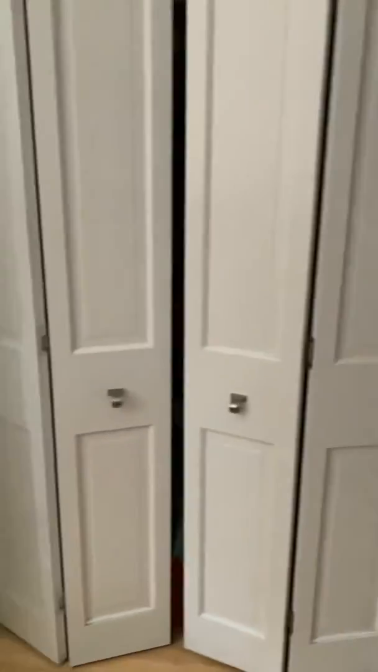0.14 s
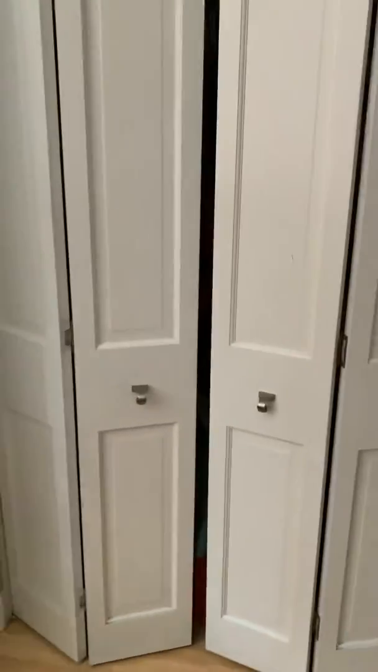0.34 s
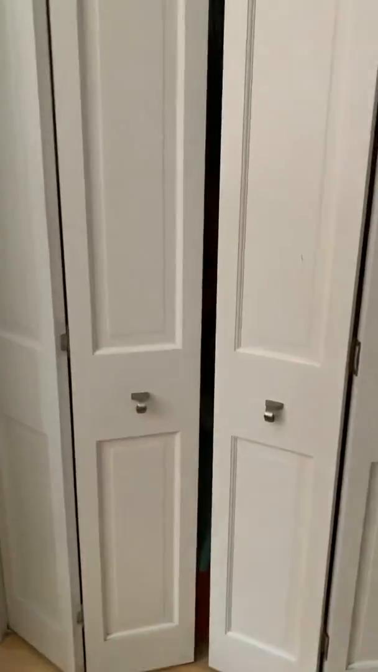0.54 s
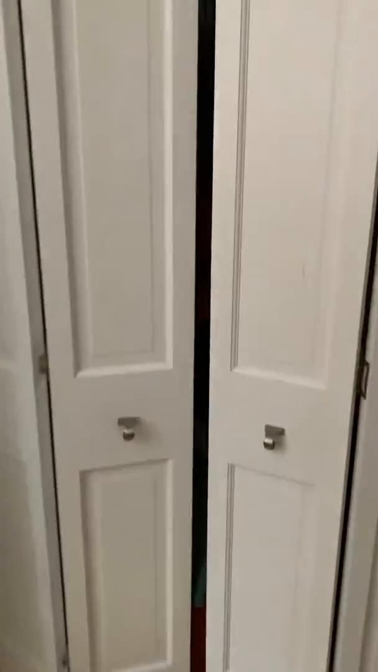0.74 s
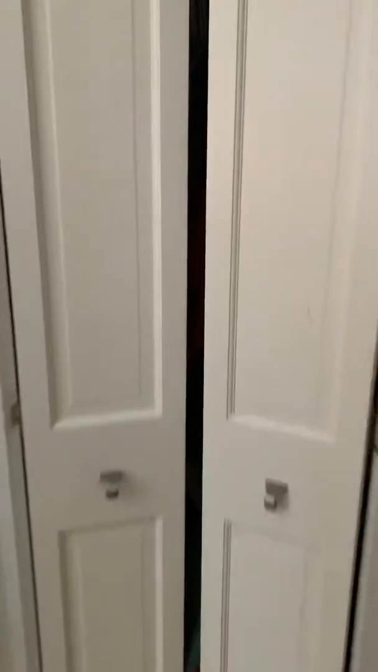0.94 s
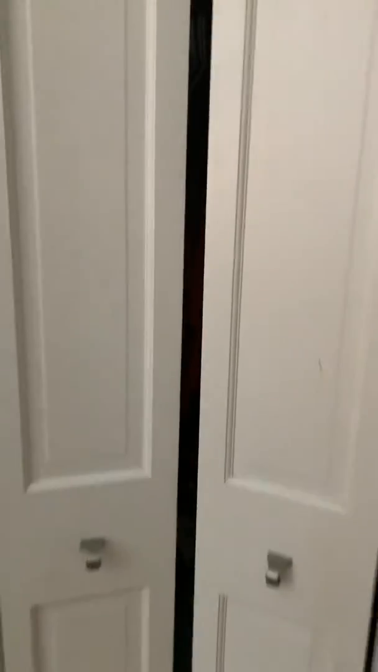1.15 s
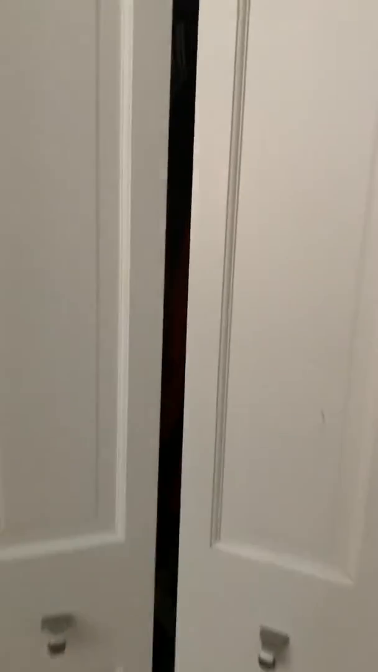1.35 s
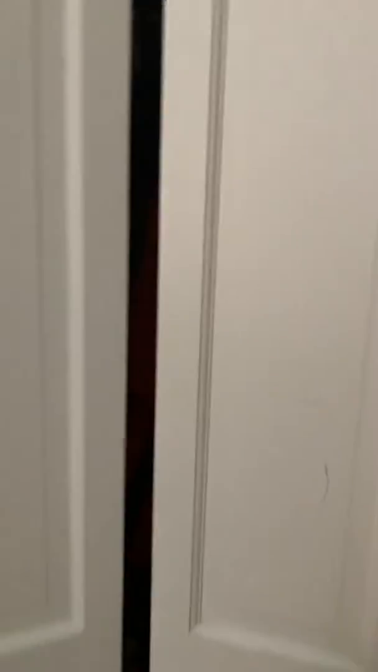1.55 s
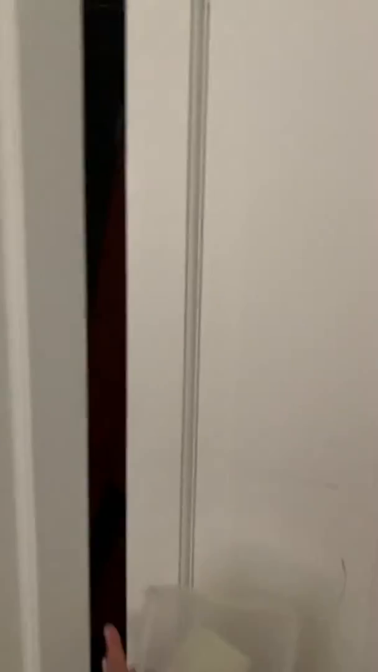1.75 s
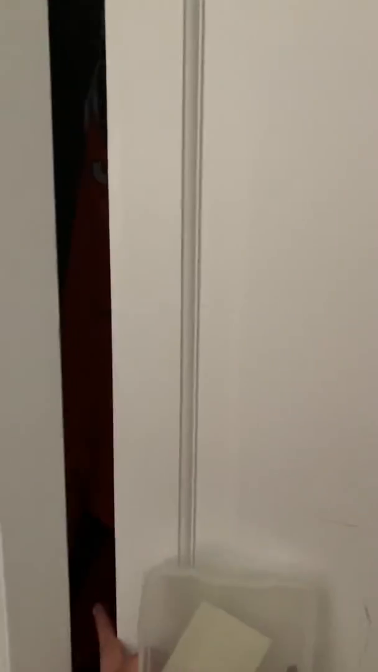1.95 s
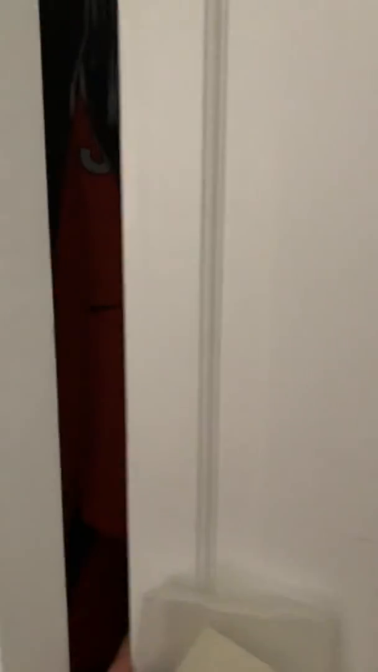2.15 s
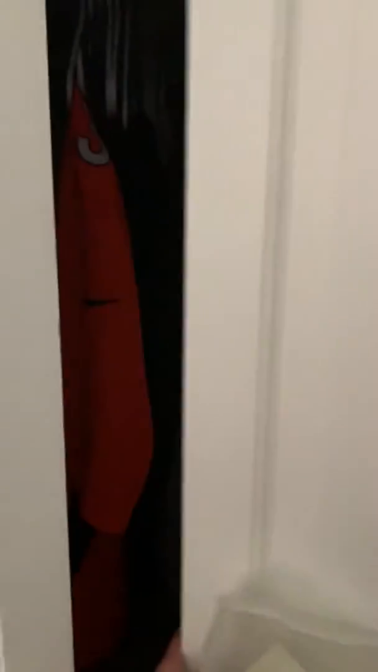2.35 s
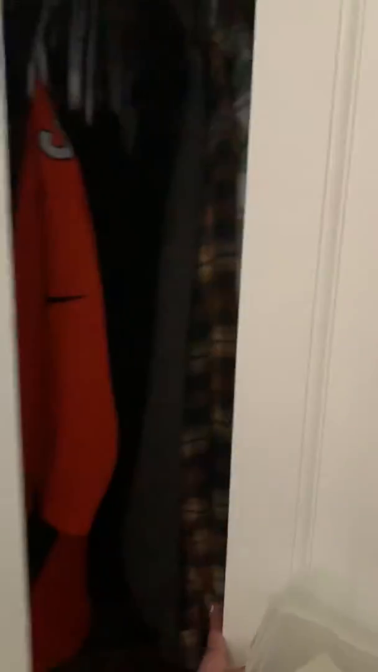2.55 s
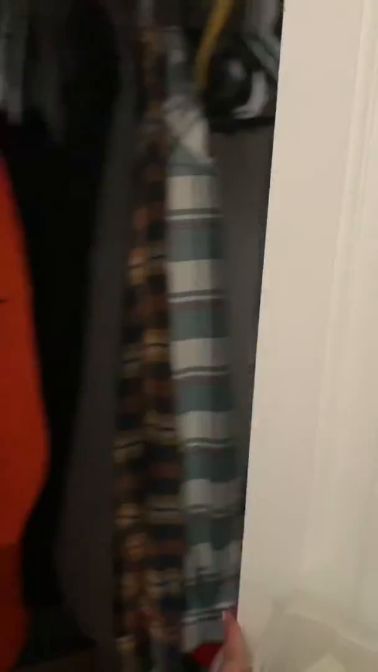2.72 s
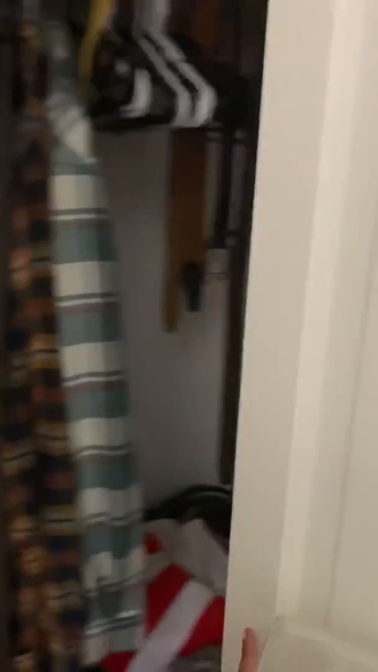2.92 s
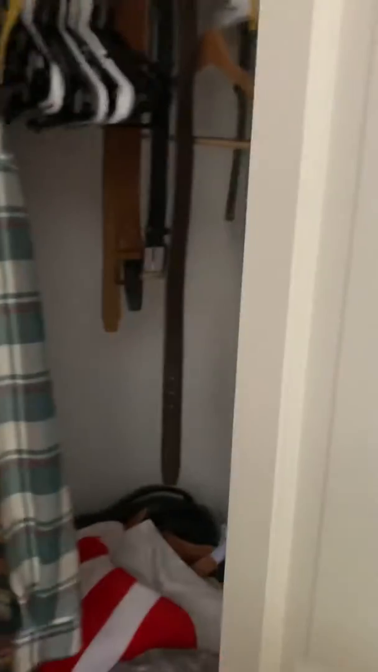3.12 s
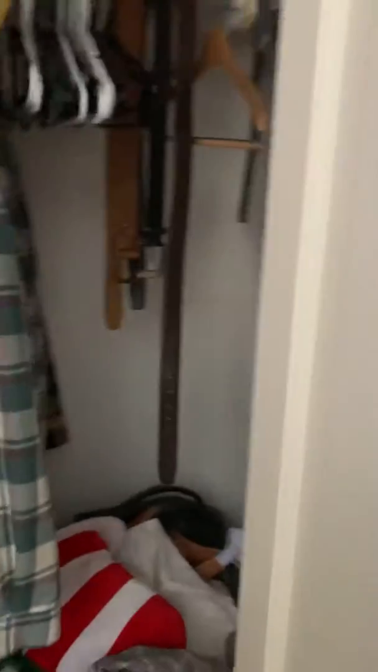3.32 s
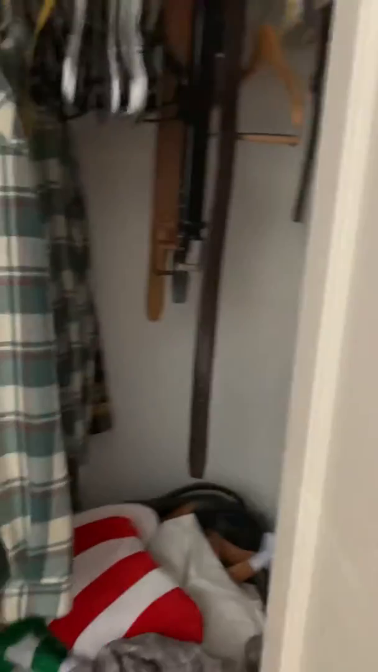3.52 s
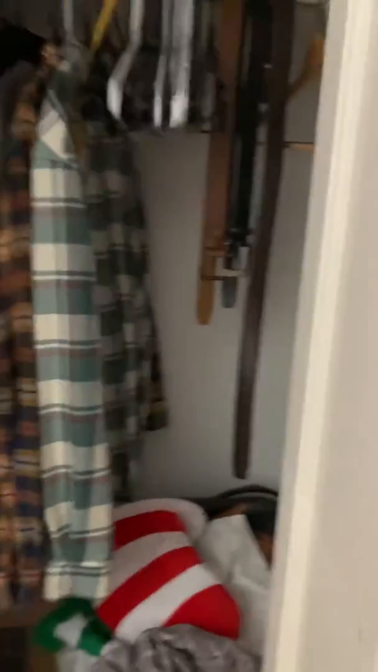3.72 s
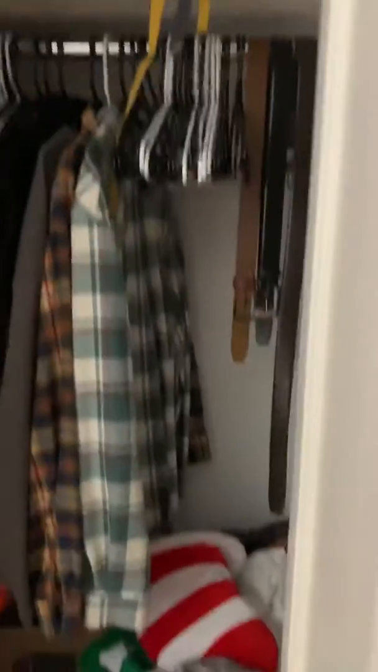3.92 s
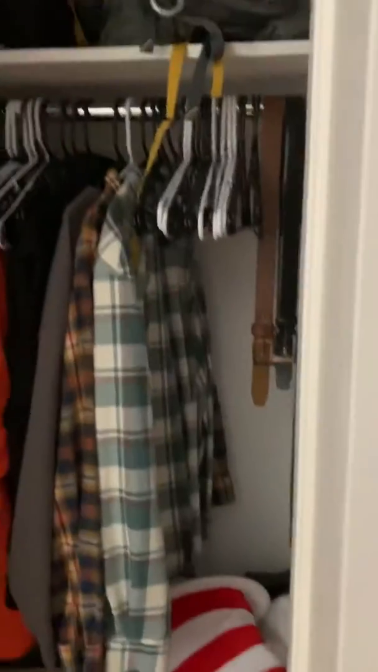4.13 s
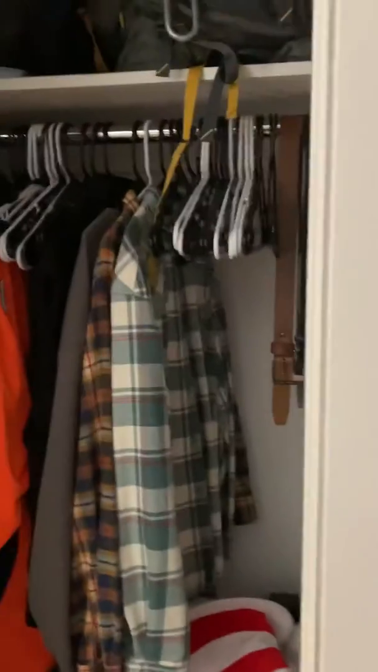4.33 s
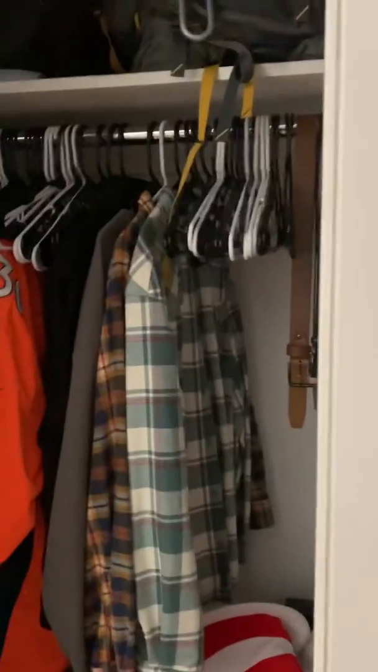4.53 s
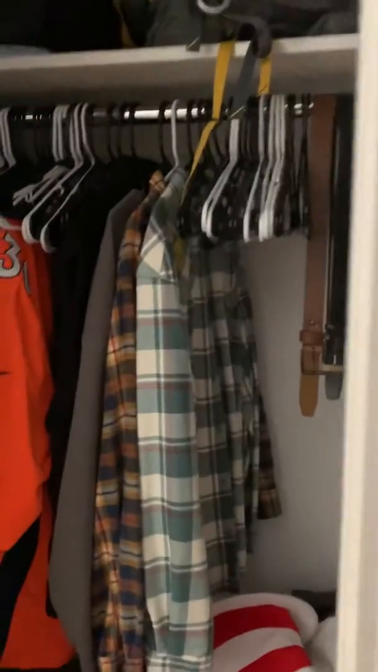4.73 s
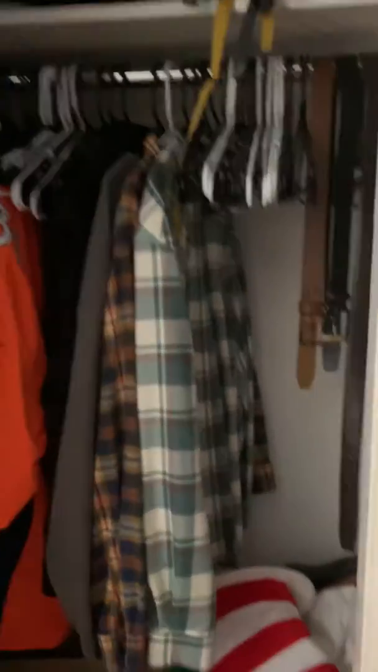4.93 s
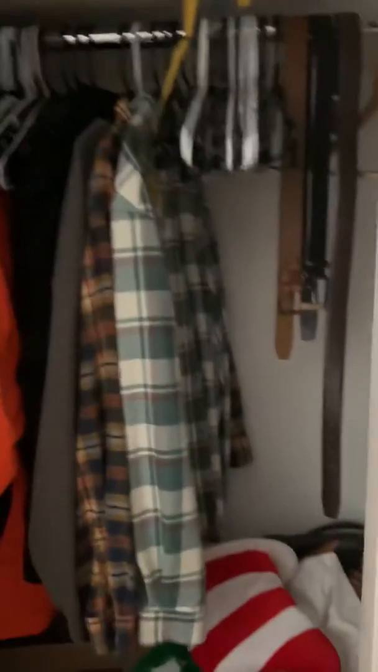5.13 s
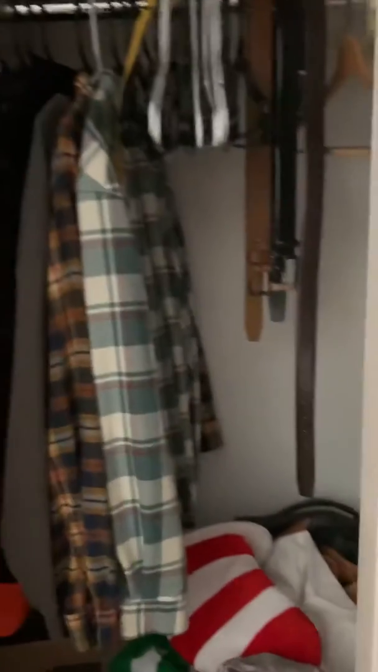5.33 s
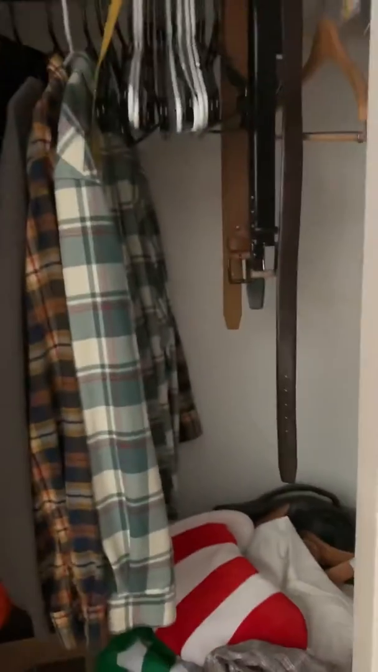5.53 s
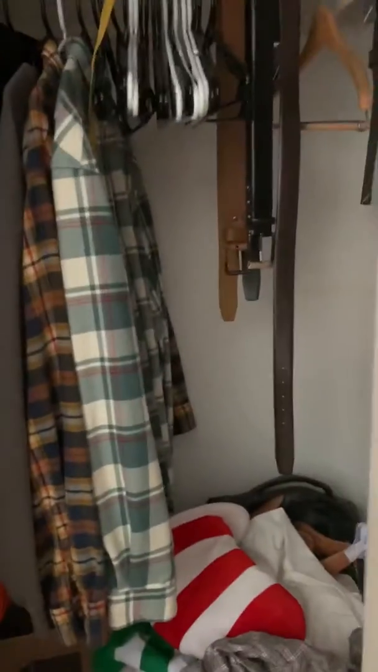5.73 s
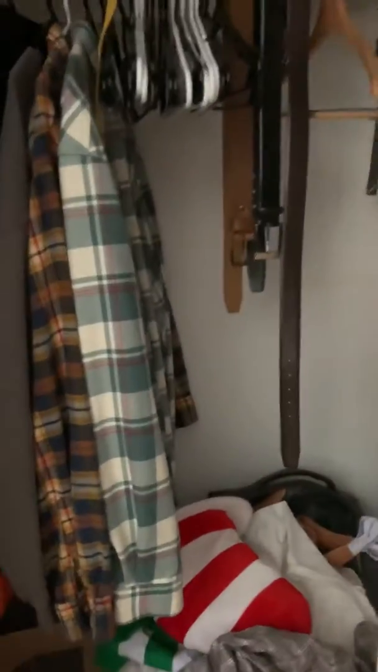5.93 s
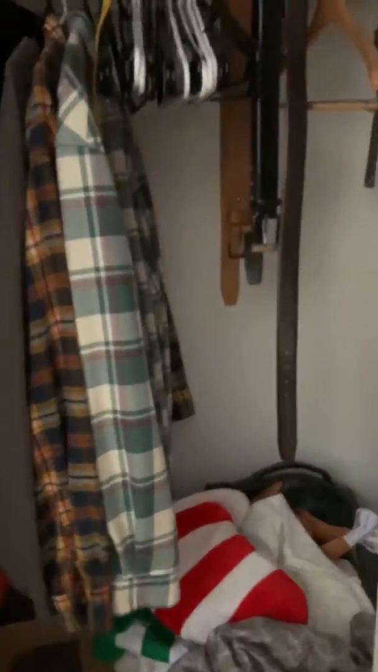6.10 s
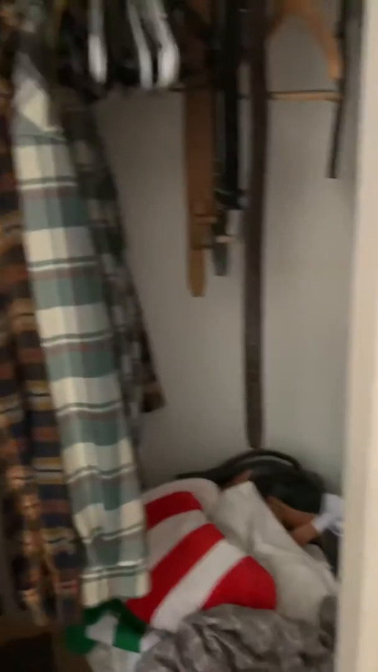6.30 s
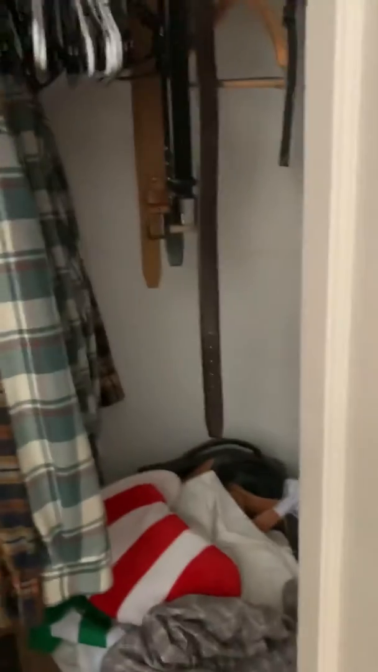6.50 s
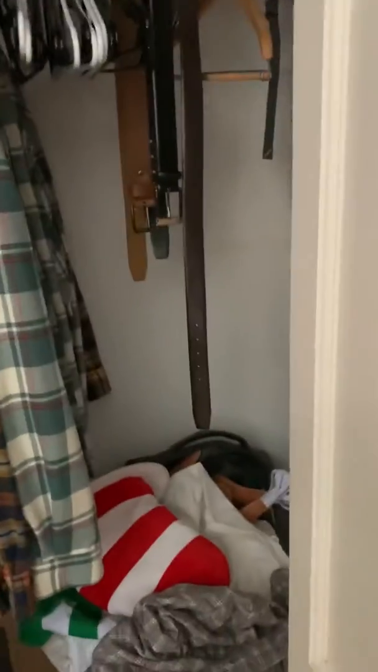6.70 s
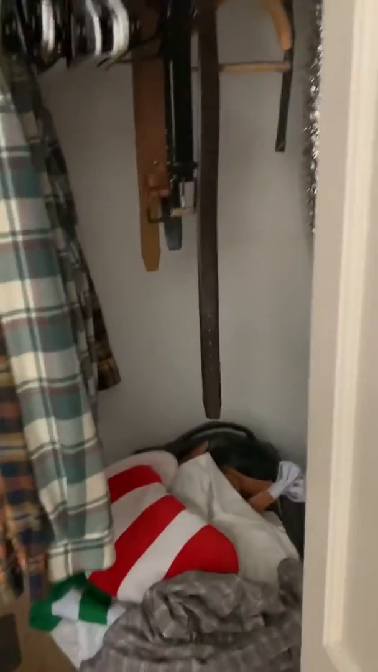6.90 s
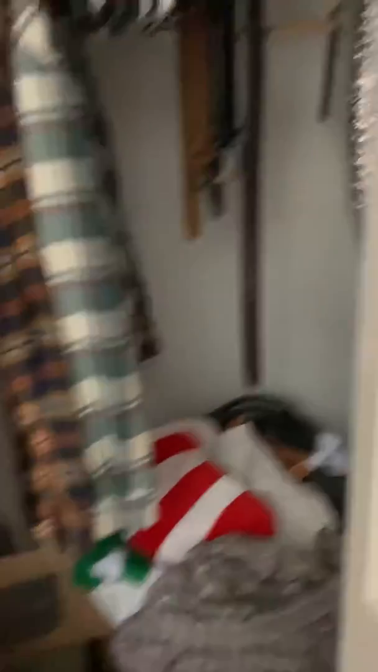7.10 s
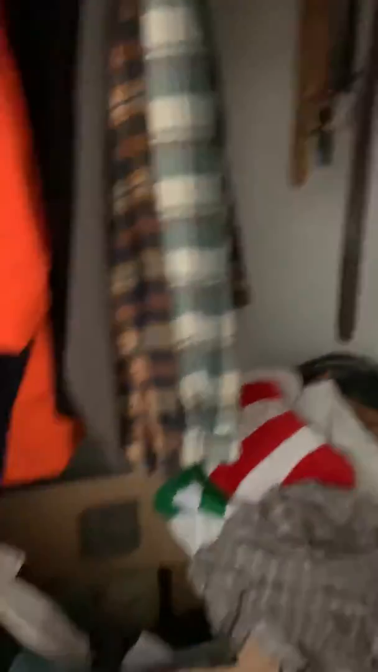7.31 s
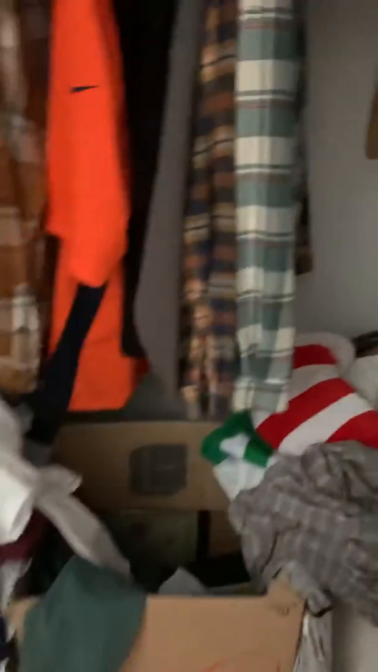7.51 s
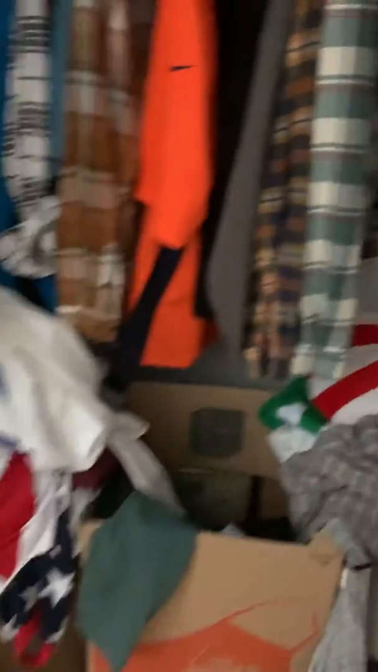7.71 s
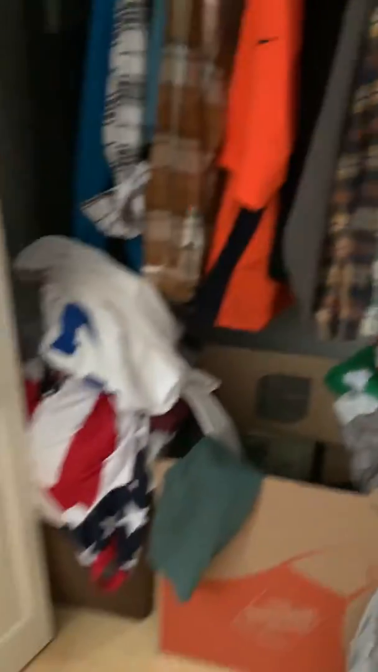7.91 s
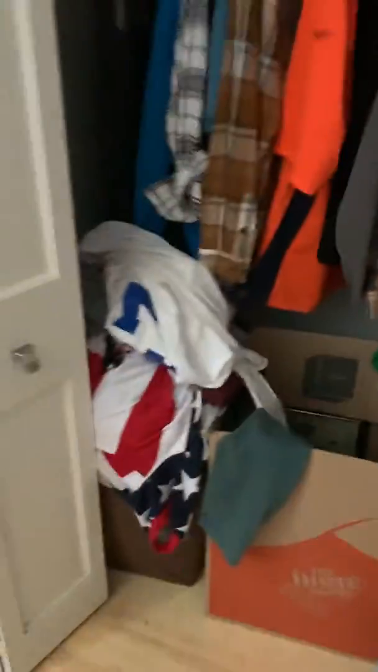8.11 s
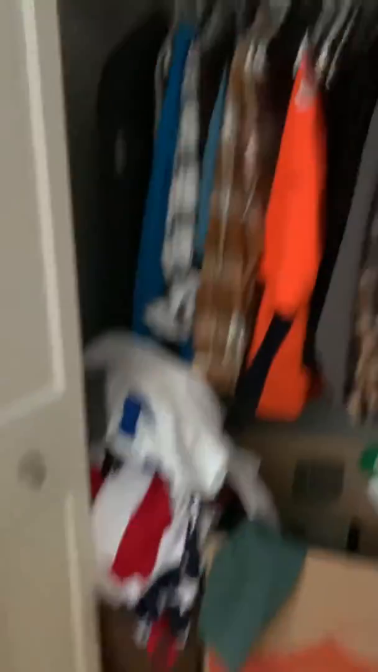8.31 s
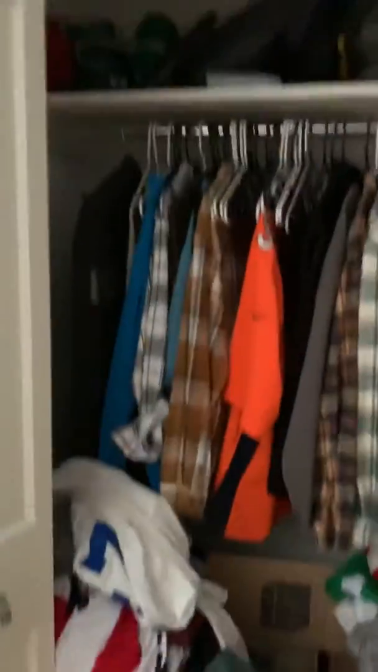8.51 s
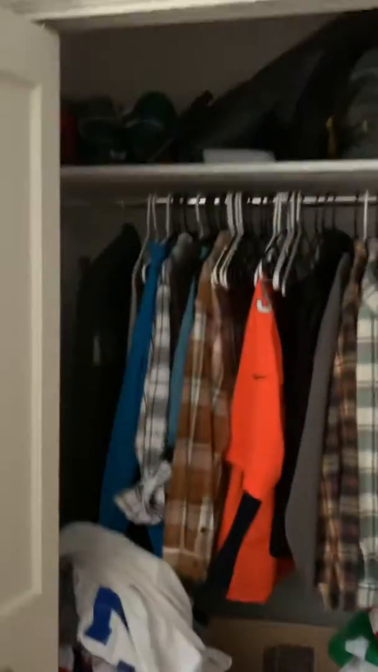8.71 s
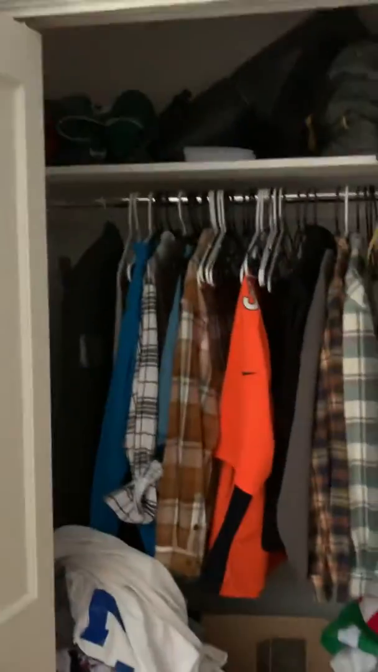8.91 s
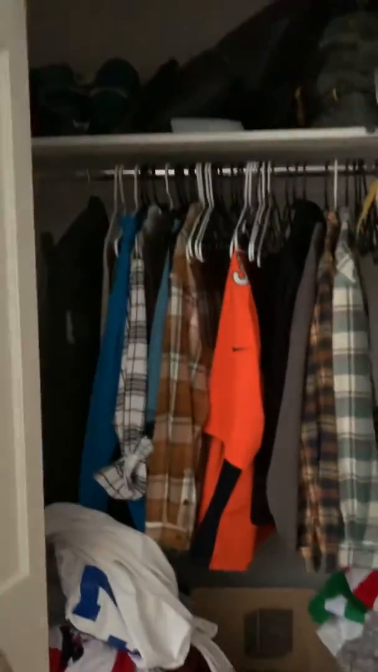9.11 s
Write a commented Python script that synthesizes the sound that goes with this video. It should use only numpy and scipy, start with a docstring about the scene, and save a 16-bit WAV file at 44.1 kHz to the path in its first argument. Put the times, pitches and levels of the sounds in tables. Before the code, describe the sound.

Hollow folding closet doors are handled close to the microphone in a small bedroom with a brief echo, over a steady low house rumble and hum. Faint rubbing leads to a few light knocks at about 1.2 seconds. A loud knock comes at 1.8, followed by the strongest scraping, hollow knocking and hinge ticking around 2.2, and more clacks until 2.8. A sharp knock at 3.5 seconds sets the panels rattling until about 4. After a quieter stretch of rustling clothes, the doors scrape and tick again just after 5 seconds and knock several times near 5.7. Softer rattles, ticks and rustles continue from 6 to 7 seconds. Soft footsteps and handling thumps are scattered throughout, the strongest at 7.3. From there only faint rustling and a small bump remain, until the end at about 9 seconds.

```python
"""A small bedroom: someone holding a phone pushes hollow folding closet doors along their track.
Blows ring the panels as knocks and hollow notes, pins and hinges tick, and tiny slips make the guides
scrape, the panels drum and clothes rustle. Steps and grips thump over the low rumble and hum of the
house. Doors and cloth echo briefly in the room; two microphone ports hear it all."""
import sys
import numpy as np
from scipy import signal
from scipy.fft import rfft, irfft, next_fast_len
from scipy.io import wavfile

SR = 44100
rng = np.random.default_rng(int(sys.argv[2]) if len(sys.argv) > 2 else 0)


def waveform_to_disk(signal):
    """Save audio, clipped to [-1, 1], as 16-bit WAV at the path in sys.argv[1]."""
    frames = np.transpose(np.atleast_2d(signal))
    scaled = np.clip(frames, -1, 1) * 32767
    samples = np.round(scaled).astype(np.int16)
    wavfile.write(sys.argv[1], SR, samples)


N = 403515


def amp(db):
    """dB to gain."""
    return 10 ** (np.asarray(db) / 20)


def unit_rms(x):
    """Scale to rms 1."""
    return x / np.sqrt(np.mean(x ** 2) + 1e-20)


def at_hz(table, hz):
    """Interpolate a table's columns over log frequency."""
    f, *columns = np.transpose(table)
    return np.squeeze([np.interp(np.log(hz + 1), np.log(f + 1), c) for c in columns])


def colour(x, spectrum):
    """Filter by a spectrum in dB."""
    size = next_fast_len(x.shape[-1])
    gain = amp(at_hz(spectrum, np.fft.rfftfreq(size, 1 / SR)))
    return irfft(rfft(x, size) * gain, size)[..., :x.shape[-1]]


def add(mix, start_s, sound):
    """Mix a sound in at start_s."""
    part = mix[round(start_s * SR):][:len(sound)]
    part += sound[:len(part)]


# Rumble spectrum: f/Hz, relative density/dB
RUMBLE_SPECTRUM = [(25, -10), (55, 7), (95, -4), (200, -13.5), (450, -25.5), (1200, -49), (16000, -79.5)]
# Hum bands: f/Hz, width/Hz, level/dB
HUM_BANDS = [(66.3, 6.6, -59.5), (123, 9.2, -56)]
RUMBLE_DB = -48.5

def house():
    """Rumble and faint hiss, with two narrow noise bands as a wavering hum."""
    noise = rng.standard_normal((3, 2, N))
    out = amp(RUMBLE_DB) * unit_rms(colour(noise[0], RUMBLE_SPECTRUM))
    for (hz, width_hz, db), x in zip(HUM_BANDS, noise[1:]):
        out += amp(db) * unit_rms(signal.lfilter(*signal.iirpeak(hz, hz / width_hz, SR), x))
    return out


# Steps, and the hand on door and phone: t/s, level/dB, f/Hz
SOFT_BLOWS = [(1.855, -28, 60.7), (2.485, -27.5, 68.5), (3.51, -28, 92.56), (5.597, -30, 66.9),
              (6.296, -32.5, 78.3), (6.922, -30, 78), (7.303, -21, 81), (7.386, -29, 42.16),
              (7.468, -35, 99.6), (7.767, -35.5, 120.6), (8.359, -37, 130)]

def thumps():
    """Soft blows: three low partials rise together and fall 60 dB in 32 cycles."""
    out, t = np.zeros(N), np.arange(SR // 2) / SR
    attack = 1 - np.exp(-t / 0.0035)
    for (s, db, hz), detune in zip(SOFT_BLOWS, rng.uniform(-1.1, 1, (len(SOFT_BLOWS), 3, 1))):
        swing = np.sin(2 * np.pi * hz * 2 ** (0.4 * detune) * t).sum(0) / 2
        add(out, s, amp(db - 60 * t * hz / 32) * attack * swing)
    return out


# Door modes: f/Hz, level/dB, t60/s at damping 1
DOOR_MODES = [(216.7, -0.5, 0.14), (359, -0.5, 0.15), (481, 2.5, 0.081), (606, -2, 0.071), (765, -3, 0.048),
              (982, 1, 0.038), (1232, -1.5, 0.069), (1566, -5, 0.09), (1916, 3, 0.027), (2286, -8.5, 0.054),
              (2898, -1, 0.019), (3657, 0, 0.017), (4385, 0, 0.044)]

def door_ring(centre_hz, octaves, damping):
    """Impulse response of one spot: modes near centre_hz ring most, tuned and weighted at random."""
    hz, db, t60_s = np.transpose(DOOR_MODES)[:, :, None]
    detune, share = rng.uniform(-1.06, 1, (2, len(DOOR_MODES), 1))
    t = np.arange(SR // 12) / SR
    weight = np.exp(-.5 * (np.log2(hz / centre_hz) / octaves) ** 2) * np.sign(share) * amp(3.4 * share)
    modes = amp(db - 60 * t * damping / t60_s) * np.cos(2 * np.pi * hz * (1 + 0.074 * detune) * t)
    return (weight * modes).sum(0)


def grains(per_s, spread_db):
    """Tiny slips as random impulses, a few of them large."""
    count, out = int(per_s * N / SR), np.zeros(N)
    sizes = amp(spread_db * np.minimum(rng.exponential(1, count), 5))
    out[rng.integers(0, N, count)] = sizes * rng.choice([-1., 1.], count)
    return out


def slips(per_s, centre_hz, octaves, damping, spread_db, spots):
    """Slips ring several spots on the doors, each in turn."""
    turn, out = np.arange(N) / SR * 6.5, np.zeros(N)
    for k in range(spots):
        active = np.cos(np.pi * (turn + k) / spots) ** 4
        spot_hz = centre_hz * 2 ** (0.43 * (k + rng.random()) / spots - .35)
        ring = door_ring(spot_hz, octaves, damping)
        out += signal.oaconvolve(active * grains(per_s, spread_db), ring / np.linalg.norm(ring))[:N]
    return unit_rms(out)


# Slow stir of hand, sleeve and doors: t/s, scrape/dB, drum/dB, rustle/dB
SLOW_STIR = [(0.0, -83.5, -62, -72.5), (2.3, -51, -69.5, -111), (3.45, -65, -63, -56.5),
             (4.13, -58.5, -57, -55), (4.439, -72.5, -62.5, -103.5), (6.5, -66, -75.5, -93),
             (7.37, -72, -60, -102.5), (8.499, -94.5, -71, -105), (9.15, -90, -62.5, -86)]
# Pushes and rubs, levels at their end: t/s, length/s, growth/dB, scrape/dB, drum/dB, rustle/dB, fade/s
PUSHES = [(0.622, 0.39, 13, -59, -53.5, -90, 0.17), (1.206, 0.069, 11.5, -29.5, -33.5, -34.5, 0.55),
          (1.643, 0.19, 12.5, -50, -47.5, -54.5, 0.19), (2.061, 0.1, 20.5, -22.5, -24.5, -31.5, 0.2),
          (2.172, 0.039, 12, -28, -28, -33, 0.37), (4.522, 0.19, 21.5, -59, -57.5, -61.5, 1.9),
          (5.102, 0.18, 9, -33, -35.5, -36, 0.3), (6.482, 0.2, 16.5, -52.5, -46.5, -68, 1.13),
          (6.996, 0.18, -3.5, -48, -43, -88, 0.51), (8.12, 0.17, 7.5, -64, -73.5, -55, 0.41)]
# Jolts that leave the doors rattling: t/s, scrape/dB, drum/dB, rustle/dB, fade/s
DOOR_JOLTS = [(0.177, -59, -55.5, -73, 0.51), (0.966, -45.5, -49.5, -49, 0.306),
              (1.124, -48.5, -71, -70, 2.7), (1.479, -34, -34.5, -41, 0.21),
              (1.812, -29.5, -25.5, -59, 0.37), (2.016, -36, -38.5, -51.5, 0.28), (2.4, -39, -57, -82, 1.2),
              (2.563, -29.5, -42.5, -45, 0.38), (2.679, -28, -38.5, -31.5, 0.34),
              (2.805, -35, -50.5, -52, 0.78), (3.126, -46, -66.5, -75, 0.65),
              (3.514, -29, -25.5, -38, 0.69), (3.742, -32.5, -30.5, -69, 0.82), (5.052, -46, -46.5, -58, 1),
              (5.525, -49, -45, -67, 0.5), (5.573, -41.5, -36.5, -57, 0.54), (5.676, -39, -32.5, -58, 0.54),
              (5.788, -30.5, -29.5, -41, 0.37), (5.9, -39, -42, -46, 0.42), (6.135, -43, -40, -62, 0.282),
              (6.295, -42, -38.5, -51.5, 0.27), (6.661, -48.5, -71, -38.5, 0.55),
              (6.742, -42, -40.5, -46, 0.79), (6.91, -39.5, -36.5, -76, 0.46),
              (7.478, -63.5, -63, -68, 0.47), (7.69, -61.5, -61, -62.5, 1.45), (7.828, -58, -69, -53, 0.2),
              (7.99, -72, -70, -57, 0.5), (8.103, -62.5, -77, -52, 0.31)]
ATTACK_S, FADE_RATES = 0.003, [1.17, 0.98, 1.235]  # scrape, drum, rustle: t60 = fade / rate

def motion_db():
    """Scrape, low drum, high drum and rustle levels: pushes and jolts add their power to the stir."""
    t = np.arange(0, N / SR + .002, .001)
    stir_s, *stir_db = np.transpose(SLOW_STIR)
    scrape, drum, rustle = amp([np.interp(t, stir_s, db) for db in stir_db]) ** 2
    power = np.array([scrape, drum, 0 * drum, rustle])
    jolts = [(s, 0, 0, *rest) for s, *rest in DOOR_JOLTS]
    for start_s, length_s, growth_db, *db, fade_s in PUSHES + jolts:
        to_go = np.clip((start_s + length_s - t) / max(length_s, ATTACK_S), 0, 1)
        since_s = np.maximum(t - start_s - length_s, 0)
        loss_db = growth_db * to_go + np.outer(FADE_RATES, 60 * since_s / fade_s)
        attack = np.clip((t - start_s) / ATTACK_S, 0, 1)
        scrape, drum, rustle = (attack * amp(np.c_[db] - loss_db)) ** 2
        # Panels shaken more than scraped swing in their lowest modes.
        shaken = 1 / (1 + np.exp((db[0] - db[1]) / 0.61))
        power += [scrape, shaken * drum, (1 - shaken) * drum, rustle]
    return [np.interp(np.arange(N) / SR, t, 10 * np.log10(p + 1e-20)) for p in power]


# Cloth and edge rustle: f/Hz, relative density/dB
RUSTLE_SPECTRUM = [(1200, -20.5), (2500, 6), (4500, 2.5), (7500, 3.5), (10500, -1.5), (14000, -13)]

def rubbing():
    """Guides scrape, shaken panels drum and sway, edges and cloth add fine bright grains."""
    scrape_db, low_db, high_db, rustle_db = motion_db()
    sway = colour(rng.standard_normal(N), [(15, -26.0), (40, 9.5), (110, 2.5), (300, -53.0)])
    low = slips(per_s=220, centre_hz=265, octaves=0.42, damping=6.8, spread_db=1.7, spots=4)
    high = slips(per_s=400, centre_hz=600, octaves=0.23, damping=3.5, spread_db=3.0, spots=4)
    drum = amp(low_db) * (low + amp(-4.0) * unit_rms(sway)) + amp(high_db) * high
    fine = sum(signal.lfilter(*signal.butter(4, 6000, side, fs=SR), grains(per_s=4000, spread_db=3.8))
               for side in ("low", "high"))
    rustle = colour(unit_rms(fine) + 0.17 * rng.standard_normal(N), RUSTLE_SPECTRUM)
    guides = slips(per_s=500, centre_hz=1560, octaves=0.97, damping=5.8, spread_db=3.9, spots=7)
    scrape = signal.lfilter(*signal.butter(2, 7000, fs=SR), guides)
    return amp(scrape_db) * scrape + drum + amp(rustle_db) * unit_rms(rustle)


# Pin and hinge ticks: t/s, peak/dB
HINGE_TICKS = [(1.76, -32), (2.1344, -17.5), (2.153, -22.5), (2.172, -12), (5.2183, -19.5), (5.257, -22.5),
               (5.297, -18), (6.6687, -30), (6.6868, -27.5), (6.7408, -23.5)]
TICK_BAND_HZ = [6760, 10000]

def ticks():
    """Pins and hinges tick: bright noise bursts that crest after 1 ms."""
    out, t = np.zeros(N), np.arange(SR // 100) / SR
    band = signal.butter(2, TICK_BAND_HZ, "band", fs=SR)
    for (s, db), noise in zip(HINGE_TICKS, rng.standard_normal((len(HINGE_TICKS), len(t)))):
        burst = signal.lfilter(*band, noise * t * np.exp(-t / 0.001))
        add(out, s, amp(db) * burst / abs(burst).max())
    return out


# Soft blows on a hollow panel: t/s, level/dB, f/Hz
PANEL_BUMPS = [(0.823, -44, 348), (1.481, -30, 391.3), (1.711, -33, 329), (1.816, -22.5, 206.3),
               (2.212, -14.5, 762.6), (2.5, -28, 203), (3.518, -22, 211), (3.519, -24, 375),
               (3.6, -22.5, 348.6), (3.748, -23, 353.5), (3.759, -28, 199.8), (4.674, -41, 346),
               (8.38, -43.5, 386)]
BUMP_RISE_S, BUMP_T60_S = 0.0073, 0.18

def bumps():
    """A panel's note swells and dies, rattling against four detuned, looser neighbours."""
    out, t = np.zeros(N), np.arange(SR // 4) / SR
    attack = 1 - np.exp(-(t / BUMP_RISE_S) ** 2)
    for (s, db, hz), (detune, phase) in zip(PANEL_BUMPS, rng.uniform(-1, 1, (len(PANEL_BUMPS), 2, 4, 1))):
        neighbours = np.sin(2 * np.pi * hz * (1 + .3 * detune) * t + np.pi * phase).sum(0)
        note = np.sin(2 * np.pi * hz * t) + .4 * neighbours
        add(out, s, amp(db - 60 * t / BUMP_T60_S) * attack * note)
    return out


# Contact crack: f/Hz, relative density/dB
CRACK_SPECTRUM = [(1200, -27.5), (2500, -1.5), (4500, 5), (8000, -13.5), (14000, -25)]
# Panels and hardware striking: t/s, body peak/dB, centre f/Hz, crack re body/dB
DOOR_KNOCKS = [(1.22, -18, 1150, -21), (1.243, -21.5, 585, -12), (1.281, -19.5, 600, -19),
               (1.478, -27.5, 1000, 1.5), (1.813, -5, 904, -37), (1.857, -17, 2100, -9),
               (2.066, -22, 800, -18), (2.124, -18, 705, -24), (2.156, -14, 794, -15),
               (2.171, -18.5, 654, -40), (2.204, -10, 558, -33), (2.549, -18, 1760, -19),
               (2.568, -9.5, 1740, -8.5), (2.681, -24.5, 2006, 9.5), (3.514, -6.5, 1290, 7.5),
               (3.588, -17.5, 1910, -1.5), (3.738, -21.5, 1900, -0.5), (3.778, -19, 2010, -0.5),
               (3.838, -29, 1810, 9.5), (5.096, -30, 1200, 8), (5.215, -15.5, 1590, -6),
               (5.267, -24.5, 517, 9), (5.673, -11.5, 755, -26), (5.786, -13, 530, -36),
               (5.829, -15.5, 600, -31), (5.577, -29, 920, -1.5)]

def knocks():
    """Each contact chatters for a few ms, ringing the door modes and cracking sharply."""
    out, t = np.zeros(N), np.arange(SR // 50) / SR
    for s, db, hz, crack_db in DOOR_KNOCKS:
        chatter = rng.standard_normal((2, len(t))) * (t / .0008) * np.exp(-t / 0.00096)
        body = signal.oaconvolve(door_ring(hz, octaves=0.6, damping=2.1), chatter[0])
        crack = colour(chatter[1], CRACK_SPECTRUM)
        add(out, s, amp(db) * body / abs(body).max())
        add(out, s, amp(db + crack_db) * crack / abs(crack).max())
    return out


# Bedroom decay: f/Hz, t60/s
ROOM_DECAY = [(100, 0.6), (1000, 0.28), (8000, 0.095)]

def room(x, early_db, late_db):
    """Row 0: direct sound, early reflections and a tail. Row 1: other reflections only."""
    out, size = np.zeros((2, N)), SR // 2
    for k in range(3):  # three echo patterns crossfade steadily, so the echo has no fixed ringing colour
        taps = np.zeros((2, size))
        delays = np.arange(40, size - 20, 20) + rng.integers(0, 20, (2, (size - 41) // 20))
        np.put_along_axis(taps, delays, rng.choice([-1., 1.], delays.shape), 1)
        early = taps * np.exp(-np.arange(size) / SR / 0.008)
        early *= amp([[early_db], [0]]) / np.linalg.norm(early, axis=1)[:, None]
        hz, t, bands = signal.stft(taps, SR, nperseg=256)
        decay = amp(-60 * t / at_hz(ROOM_DECAY, hz)[:, None])
        late = signal.istft(bands * decay, SR, nperseg=256)[1][:, :size]
        response = early + amp(late_db) * late / np.linalg.norm(late[0])
        weight = np.sqrt(2 / 3) * np.cos(np.pi * (np.arange(N) / SR * 3.5 + k / 3))
        out += signal.oaconvolve((weight * x)[None], response[:, :SR // 4], axes=1)[:, :N]
    out[0] += x
    return out


def scene():
    """Doors and cloth in the room, thumps close, house behind. Row 0: both ports; row 1: right only."""
    blows = room(knocks() + bumps() + ticks(), early_db=-16, late_db=-13)
    friction = room(rubbing(), early_db=-11.5, late_db=-14.0)
    return blows + friction + house() + [thumps(), thumps()]


# Microphone ports: f/Hz, left lead/rad, left re right/dB, likeness/0-1
MIC_PORTS = [(60, 0, -0.5, .955), (240, -0.2, -5, .85), (385, 0.7, -6.5, .7), (600, 1.5, -1.5, .6),
             (1550, -.1, -.5, .65), (2930, 2.2, 0.5, .9), (4130, 1.6, 0.5, .7), (7670, 6.0, 0, .75),
             (13900, 12.5, 0, .85)]
CUTOFF_HZ = 16000

def record(dry):
    """Two ports hear much the same sound, shifted in phase and balance, then low-passed."""
    size = next_fast_len(N)
    lead_rad, balance_db, likeness = at_hz(MIC_PORTS, np.fft.rfftfreq(size, 1 / SR))
    shared, other = rfft(dry, size)
    shift = np.exp(1j * lead_rad / 2) * amp(balance_db / 2)
    right = likeness * shared + np.sqrt(1 - likeness ** 2) * other
    ports = irfft([shared * shift, right / shift], size)[:, :N]
    lowpass = signal.firwin(511, CUTOFF_HZ, window=("kaiser", 9), fs=SR)
    return signal.oaconvolve(ports, lowpass[None], "same")


dry = scene()
out = record(dry)
waveform_to_disk(out)
```